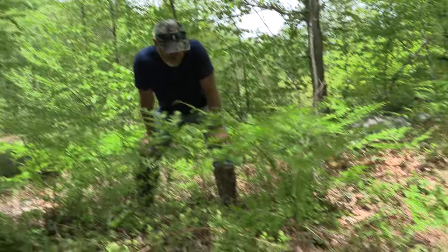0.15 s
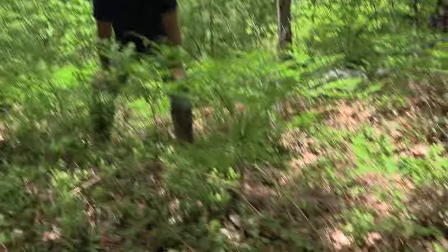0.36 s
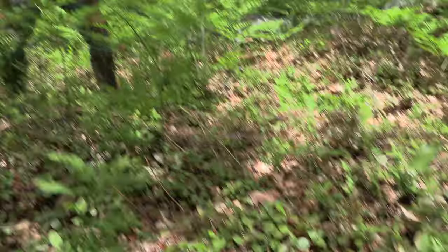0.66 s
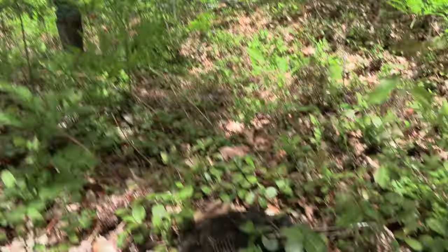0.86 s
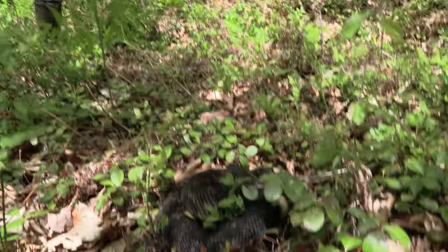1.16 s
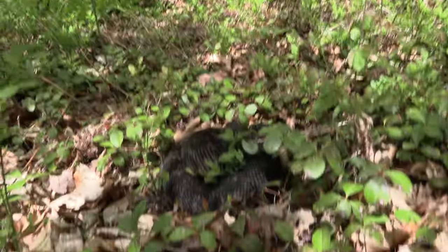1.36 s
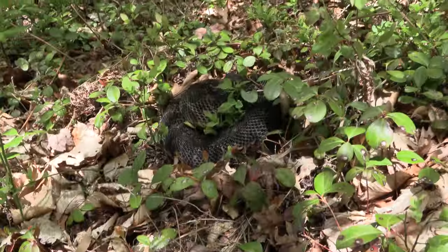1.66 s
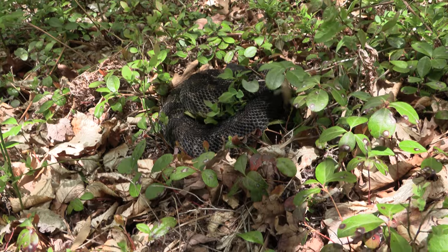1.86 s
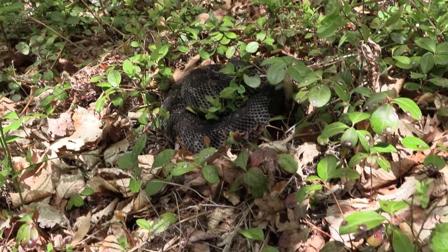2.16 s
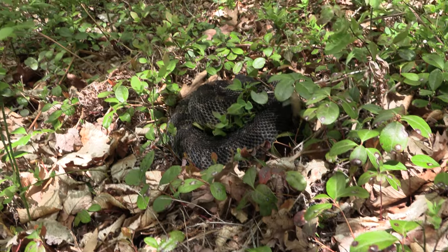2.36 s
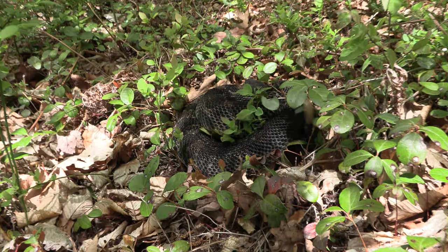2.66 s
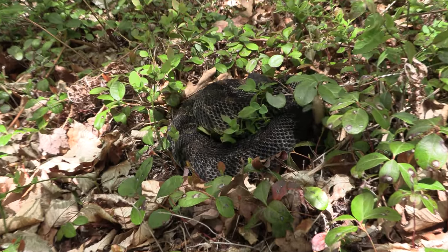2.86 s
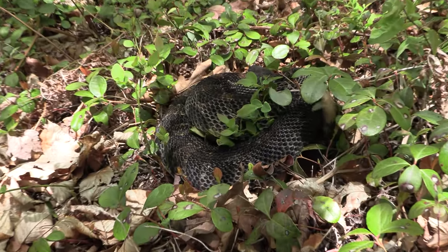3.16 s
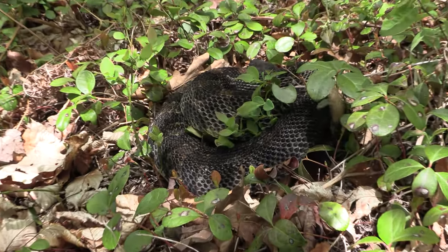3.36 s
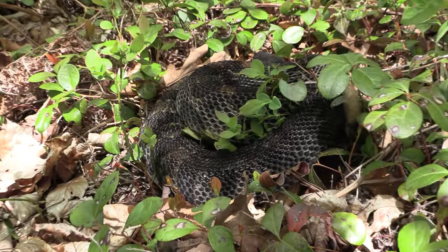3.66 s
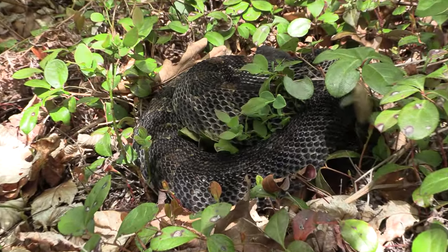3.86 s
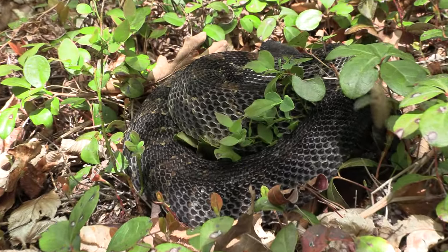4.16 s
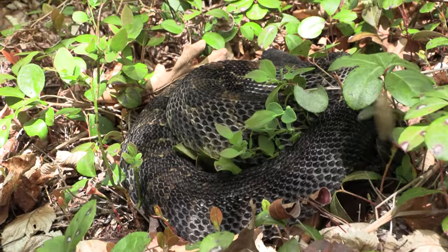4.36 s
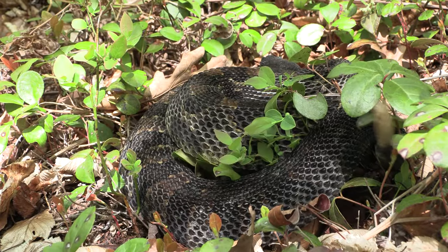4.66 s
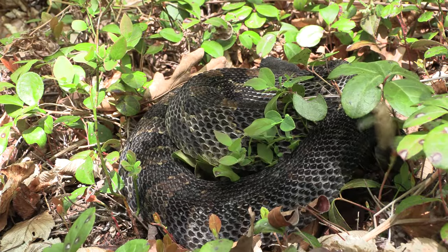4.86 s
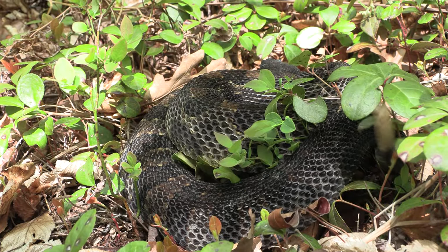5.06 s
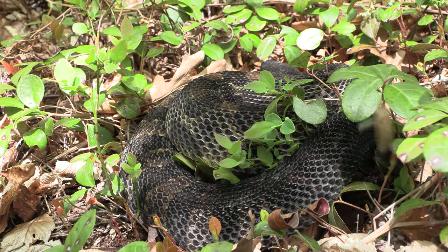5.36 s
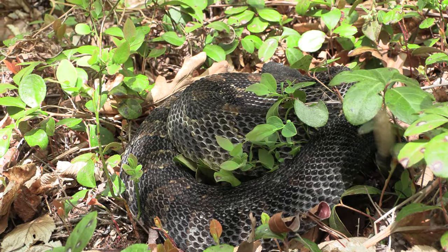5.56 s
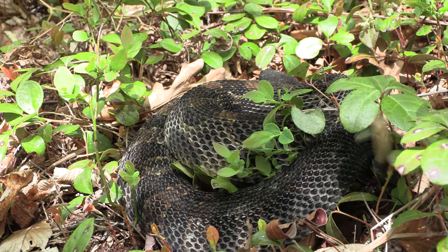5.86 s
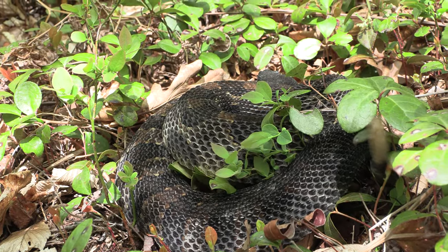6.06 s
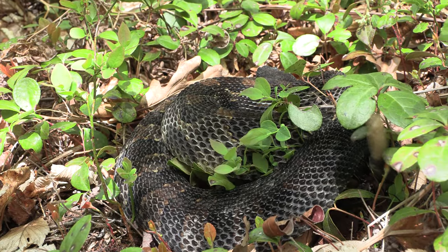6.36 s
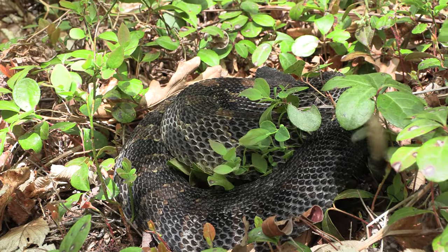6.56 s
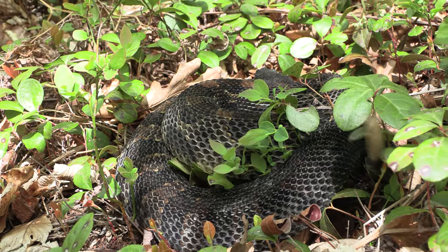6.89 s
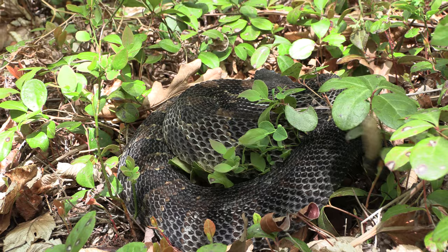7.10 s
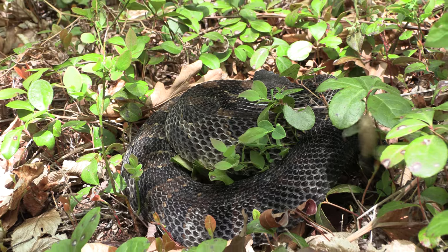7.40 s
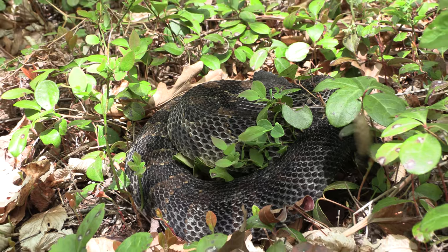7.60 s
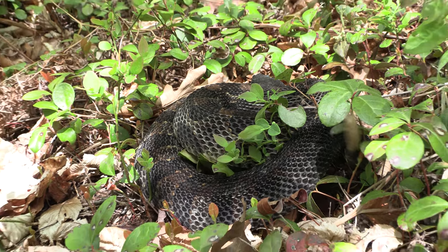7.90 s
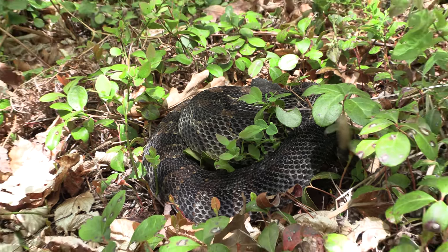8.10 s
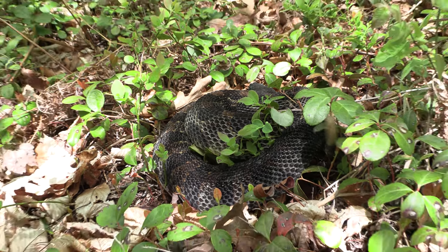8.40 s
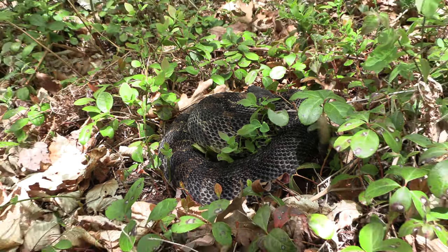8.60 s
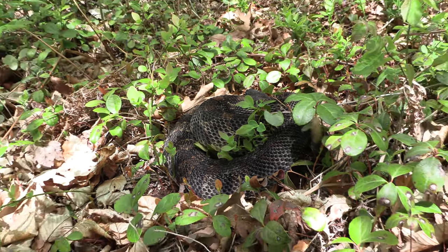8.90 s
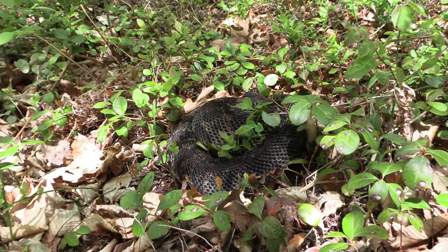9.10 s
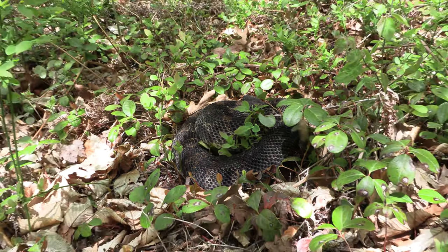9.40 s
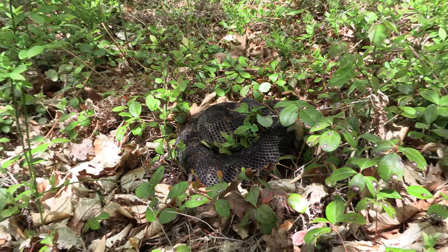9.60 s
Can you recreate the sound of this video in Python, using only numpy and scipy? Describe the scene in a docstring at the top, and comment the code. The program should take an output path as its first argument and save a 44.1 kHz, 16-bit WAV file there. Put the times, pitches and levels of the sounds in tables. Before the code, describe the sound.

A rattlesnake buzzes its tail in leaf litter, a fast, dry, high-pitched rattle that never pauses. It is heard from a handheld camera a step or two away in a very quiet wood. The buzz swells slightly and grows brighter in the first two seconds, over soft low handling bumps. Later come faint rubs, a few small grip ticks near the middle, and two spells of faint zoom motor hum.

```python
"""From the start a coiled rattlesnake buzzes its tail in leaf litter, a step or two from a handheld camera
in a very quiet wood. The tail swings about 68 times a second; at each turn its loose horny segments
collide and ring. In the first 1.6 s the camera tilts down onto the snake and the treble opens up, while
the hand rumbles, bumps and rubs on the housing. From 2.6 s, and again from 6.8 s, the zoom motor hums
faintly. The buzz runs to the end without pause."""
import sys
import numpy as np
from scipy import signal
from scipy.fft import rfft, irfft, next_fast_len
from scipy.io import wavfile

SR = 44100
rng = np.random.default_rng(int(sys.argv[2]) if len(sys.argv) > 2 else 0)


def store_pcm(level_fs):
    """Save levels as 16-bit WAV."""
    pcm = np.round(np.clip(level_fs, -1, 1) * 32767).astype(np.int16)
    wavfile.write(sys.argv[1], SR, np.atleast_2d(pcm).T)


N = 429534


def undb(db):
    """Decibels to amplitude ratio."""
    return 10 ** (np.asarray(db) / 20)


def unit(x):
    """Normalisation to rms 1."""
    return x / np.sqrt(np.mean(x ** 2))


def curve(rows):
    """Linear interpolation of rows (time_s, value), one value per sample."""
    return np.interp(np.arange(N) / SR, *np.transpose(rows))


def bell(x, centre, width):
    """Gaussian hump: 1 at its centre, 1/e one width away."""
    return np.exp(-((x - centre) / width) ** 2)


def spells(rows, ramp_s):
    """Trapezoidal envelopes from rows (start_s, end_s, gain_db)."""
    t = np.arange(N) / SR
    return sum(undb(db) * np.clip(.5 + np.minimum(t - start, end - t) / ramp_s, 0, 1)
               for start, end, db in rows)


def colour(x, points):
    """Minimum-phase filter through points (frequency_hz, gain_db)."""
    hz, db = np.transpose(points)
    size = next_fast_len(N + 8192, True)
    size += size % 2
    f = np.maximum(np.fft.rfftfreq(size, 1 / SR), 1)
    gain = undb(np.interp(np.log(f), np.log(hz), db))
    cepstrum = irfft(np.log(gain))
    cepstrum[1:size // 2] *= 2  # folding the cepstrum makes the filter causal
    cepstrum[size // 2 + 1:] = 0
    return irfft(rfft(x, size) * np.exp(rfft(cepstrum)))[:N]


def ring(x, hz, width_hz):
    """Second-order resonance, gain 1 at its centre."""
    return signal.lfilter(*signal.iirpeak(hz, hz / width_hz, fs=SR), x)


def narrow_noise(hz, width_hz):
    """Narrow-band noise: white noise through the same resonance twice."""
    return unit(ring(ring(rng.standard_normal(N), hz, width_hz), hz, width_hz))


def add(out, start_s, x):
    """Superposition of x onto out from start_s."""
    start = max(int(start_s * SR), 0)
    out[start:start + len(x)] += x[:max(N - start, 0)]


def knocks(strokes, stroke_db, lag_s, spread_s, scatter_db, decay_s):
    """Impact excitation: one loose joint cracks near each stroke, uneven in timing and force."""
    timing, strength = rng.standard_normal((len(strokes), 2)).T
    onsets = strokes + (lag_s + spread_s * timing) * SR
    force = undb(stroke_db + scatter_db * np.minimum(strength, 1))
    t = np.arange(256) / SR
    cracks = rng.standard_normal((len(strokes), len(t))) * np.exp(-t / decay_s)
    cracks *= (force / np.linalg.norm(cracks, axis=1))[:, None]
    places = (onsets.astype(int)[:, None] + np.arange(len(t))) % N
    return np.bincount(places.ravel(), cracks.ravel(), N)


def leaf_litter(x, decay_s):
    """Diffuse scattering: leaves and stems spread each knock's energy into a short wash of noise."""
    retained = np.exp(-1 / (decay_s * SR))
    energy = signal.lfilter([1 - retained], [1, -retained], x ** 2)
    wash = np.sqrt(energy) * rng.standard_normal(N)
    return colour(wash, [(3000, -2.5), (5000, 0), (9000, -11.5), (15000, 3)])


# tail swing, flagging slowly and picking up again: time_s, rate_hz
TAIL_RATE = [(0, 66.17), (0.6, 66.67), (1.1, 69.04), (3.2, 68.92), (4, 67.3), (4.9, 68.35), (7.1, 65.6),
             (8.1, 65.44), (8.6, 68.9), (9.74, 67.75)]
# cycle of four strokes, hard and soft in turn: delay_s, gain_db
STROKE_CYCLE = [(.0006, 2.8), (-.0002, -1), (-.0006, 3), (.0004, -.6)]
# spectrum of a knock between dry segments: frequency_hz, gain_db
KNOCK_SPECTRUM = [(300, -39), (1000, -27.5), (1800, -18), (2550, -8), (2900, -8.5), (3500, 0), (4200, -2.5),
                  (6000, -4), (7600, -4), (8200, -6), (9100, -4), (12400, -11), (13100, -8), (15500, -12.5)]
# resonances of the hollow segments: pitch_hz, width_hz, gain_db
SHELL_MODES = [(4530, 240, -1.5), (4730, 280, 3), (5800, 400, -7), (10520, 450, 0), (14000, 1000, -12)]


def rattle():
    """Impact and resonance: at each turn of the tail the segments collide, rebound and ring."""
    swings = np.cumsum(curve(TAIL_RATE)) / SR
    turns = np.flatnonzero(np.diff(np.floor(2 * swings + .5)))  # two to a swing
    delay_s, stroke_db = np.resize(STROKE_CYCLE, (len(turns), 2)).T
    strokes = turns + delay_s * SR
    slam = unit(knocks(strokes, stroke_db, lag_s=-.0005, spread_s=.0004, scatter_db=2.2, decay_s=.002))
    chatter = unit(sum(knocks(strokes, 0, lag_s=.004, spread_s=.003, scatter_db=0.5, decay_s=.001)
                       for _ in range(12)))
    # the small tip segments snap brightly on hard strokes; the big base ones clack lower and looser
    tip = unit(knocks(strokes, 1.6 * stroke_db, lag_s=-.0004, spread_s=.0005,
                      scatter_db=3.3, decay_s=.0013))
    base = unit(knocks(strokes, 0, lag_s=-.001, spread_s=.0012, scatter_db=4.5, decay_s=.001))
    direct = colour(slam, [(3000, -4), (5000, -2.5), (7500, -1.5), (14000, -2.5)])
    direct += undb(0.5) * chatter
    direct += colour(tip, [(3000, -31), (6000, -16), (9000, -7.5), (11000, -1.5), (13000, -6.5)])
    direct += colour(base, [(3000, -10), (4600, -5.5), (6000, 2), (8000, -31)])
    cracks = colour(direct + leaf_litter(direct, decay_s=0.03), KNOCK_SPECTRUM)
    ringing = sum(undb(db) * ring(cracks, hz, width_hz) for hz, width_hz, db in SHELL_MODES)
    return unit(cracks + ringing)


# camera tilt, from 1 (turned away) to 0 (facing the snake): time_s, turn_fraction
CAMERA_TURN = [(0.27, 1), (.45, .92), (.6, .88), (.8, .67), (1.1, .27), (1.58, 0)]
# rattle at the microphone, loudest as the camera swings past it: time_s, gain_db
RATTLE_GAIN = [(0.28, -25), (0.45, -21.5), (1.08, -22.5), (1.9, -25), (9.74, -25)]


def microphone_aim(buzz):
    """Acoustic shadow: the housing shades the treble above an edge that climbs as it faces the snake."""
    edge_away_hz, edge_facing_hz, edge_width_hz = 7400, 12350, 1300
    shade_away_db, shade_facing_db = -10, -2
    lift_db, top_db, crest_db, notch_db = 6, 0.5, 3.5, -3.5
    hz, t, frames = signal.stft(buzz, SR, nperseg=512)
    hz = hz[:, None]
    turn = np.clip(np.interp(t, *np.transpose(CAMERA_TURN)), 0, 1)
    shadow = 1 - np.exp(-turn / 0.13)
    edge_hz = edge_facing_hz * (edge_away_hz / edge_facing_hz) ** turn
    shade_db = shade_facing_db + (shade_away_db - shade_facing_db) * shadow
    above_edge = .5 + .5 * np.tanh((hz - edge_hz) / edge_width_hz)
    mid_dip = 0.37 * bell(hz, centre=1860, width=650)
    gain_db = shade_db * (above_edge + mid_dip)
    # turned fully away, the lower treble is lifted and the top is shaded slightly less
    averted = turn ** 8
    gain_db += averted * (lift_db * bell(hz, centre=3200, width=520) + top_db * (hz / edge_facing_hz) ** 2)
    # part way round, a broad crest rides below the edge
    gain_db += crest_db * (1 - averted) * turn * bell(hz / edge_hz, centre=0.68, width=0.17)
    # two paths round the housing interfere in a notch just above the edge
    gain_db += notch_db * turn * bell(hz / edge_hz, centre=1.14, width=.1)
    shaded = signal.istft(frames * undb(gain_db), SR)[1][:N]
    return shaded * undb(curve(RATTLE_GAIN))


# spectrum of the woodland air: frequency_hz, gain_db
AIR_SPECTRUM = [(25, -4), (60, 1), (150, -3), (280, 1), (450, -0.5), (700, -3.5), (1200, -4), (4000, -14),
                (15000, -21)]
# the air, louder while the camera points out into the wood: time_s, level_db
AIR_LEVEL = [(0, -52.5), (1.8, -60.5), (5, -62), (6, -66), (9.74, -63.5)]


def woodland_air():
    """Broadband ambient noise: still air, strongest at low frequencies."""
    return undb(curve(AIR_LEVEL)) * unit(colour(rng.standard_normal(N), AIR_SPECTRUM))


# spells of a faint hum: start_s, end_s, level_db
HUM_SPELLS = [(0, .42, -58), (5.3, 6.8, -70.5)]


def faint_hum():
    """Narrow-band noise is heard as a wavering tone that comes and goes."""
    return spells(HUM_SPELLS, ramp_s=0.14) * narrow_noise(hz=328, width_hz=24)


def hand_rumble():
    """Structure-borne noise: it builds as the camera swings and settles to the hand's slight tremor."""
    peak_s, peak_db, tremor_db = 0.39, -50, -71
    rise_db_per_s, settle_db_per_s = 17, 9.5
    since_peak_s = np.arange(N) / SR - peak_s
    swing_db = peak_db + np.minimum(rise_db_per_s * since_peak_s, -settle_db_per_s * since_peak_s)
    spectrum = [(15, 1.5), (38, -0.5), (65, -4.5), (110, -4.5), (200, -21), (600, -29.5)]
    rumble = unit(colour(rng.standard_normal(N), spectrum))
    return rumble * np.hypot(undb(swing_db), undb(tremor_db))


def tap(peak_db, hz, width_hz, scuff_s):
    """Impulse response: a finger lands and scuffs, exciting a damped resonance of the camera body."""
    t = np.arange(SR // 4) / SR
    push = undb(-15) * rng.standard_normal(len(t)) * np.exp(-t / scuff_s)
    push[0] = 1
    response = ring(ring(push, hz, width_hz), hz, width_hz)
    return undb(peak_db) * response / np.abs(response).max()


# dull bumps on the camera body: start_s, peak_db, pitch_hz
BODY_BUMPS = [(0.169, -36.5, 112), (0.289, -40, 109), (0.351, -37.5, 107), (0.432, -39, 150),
              (0.47, -41, 50), (0.598, -40, 120), (0.989, -45, 45), (1.055, -45, 180), (1.519, -52, 108),
              (1.697, -54, 42), (5.439, -46, 105), (5.56, -50, 95), (7.055, -51, 102), (7.725, -49, 108.5)]


def body_bumps():
    """Damped low resonances: the hand's longer contacts sound as dull thuds."""
    out = np.zeros(N)
    for start_s, peak_db, hz in BODY_BUMPS:
        add(out, start_s, tap(peak_db, hz, width_hz=0.4 * hz, scuff_s=0.031))
    return out


# soft rubs close by: centre_s, half_length_s, level_db
RUBS = [(1.107, 0.088, -51.5), (1.508, 0.29, -48.5), (2.046, 0.074, -40.5), (2.568, 0.14, -50),
        (3.414, 0.089, -46), (4.01, 0.093, -45.5), (4.593, 0.32, -49.5), (5.06, 0.18, -47),
        (8.286, 0.23, -51)]
# spectrum of the rubbing: frequency_hz, gain_db
RUB_SPECTRUM = [(100, -12), (300, -2.5), (600, -1.5), (850, -1), (1100, 3), (1350, 1), (1800, 7), (2400, 9),
                (4000, -42)]


def rubbing():
    """Friction noise: each soft rub swells and fades."""
    t = np.arange(N) / SR
    swell = sum(undb(db) * bell(t, centre_s, half_length_s) for centre_s, half_length_s, db in RUBS)
    return swell * unit(colour(rng.standard_normal(N), RUB_SPECTRUM))


# small ticks of the grip: start_s, peak_db, pitch_hz, width_hz
GRIP_TICKS = [(1.086, -33, 1150, 2000), (2.467, -32.5, 397, 300), (4.545, -21.5, 1500, 2000),
              (4.630, -22.5, 1100, 3000), (4.726, -31, 1200, 2200)]


def grip_ticks():
    """Heavy damping: a brief contact on a broad resonance dies at once, as a tick."""
    out = np.zeros(N)
    for start_s, peak_db, hz, width_hz in GRIP_TICKS:
        add(out, start_s, tap(peak_db, hz, width_hz, scuff_s=0.00088))
    return out


# zoom runs (in, a brief strain, creeping out, out at full speed): start_s, end_s, gain_db
ZOOM_RUNS = [(2.6, 4.36, -56), (3.43, 3.57, -54), (6.82, 8.1, -65), (8.1, 9.7, -57.5)]
# resonances of the lens drive and camera body: pitch_hz, width_hz, gain_db
MOTOR_MODES = [(172.4, 28, -1.5), (142.7, 26, -5), (108, 66, -10)]
# the hum's roll-off above its top resonance: frequency_hz, gain_db
MOTOR_SPECTRUM = [(60, -2), (110, 0.5), (192, 0), (225, -22)]


def zoom_motor():
    """Forced vibration: the running lens drive hums roughly and shakes the body at a lower pitch."""
    hum = sum(undb(db) * narrow_noise(hz, width_hz) for hz, width_hz, db in MOTOR_MODES)
    return spells(ZOOM_RUNS, ramp_s=0.15) * colour(hum, MOTOR_SPECTRUM)


def scene():
    """Superposition at one microphone: the snake, the camera's own sounds and the wood."""
    snake = microphone_aim(rattle())
    camera = hand_rumble() + zoom_motor() + body_bumps() + grip_ticks() + rubbing()
    return (snake + camera + woodland_air() + faint_hum())[None]


def record(dry):
    """Band limiting: an elliptic low-pass cuts the top steeply."""
    cutoff_hz = 15850
    return signal.sosfilt(signal.ellip(12, .1, 90, cutoff_hz, fs=SR, output="sos"), dry)


dry = scene()
out = record(dry)
store_pcm(out)
```